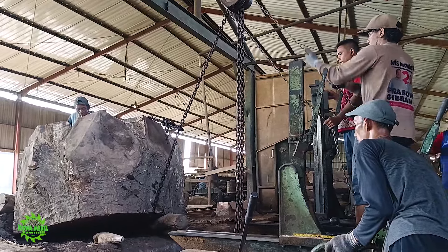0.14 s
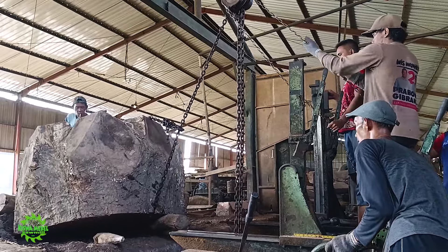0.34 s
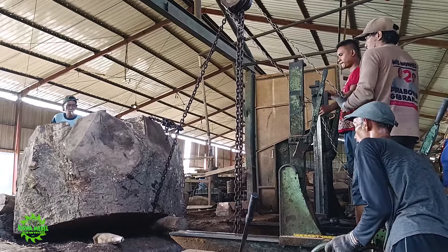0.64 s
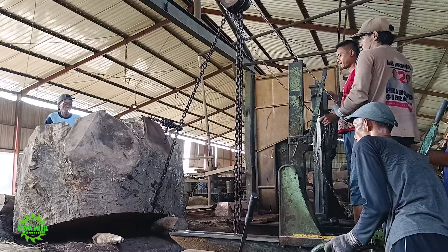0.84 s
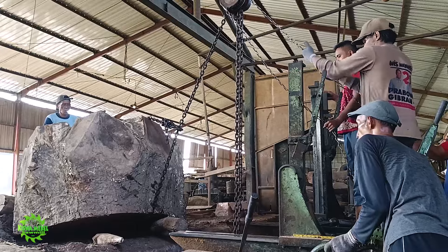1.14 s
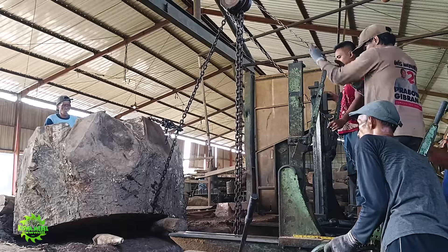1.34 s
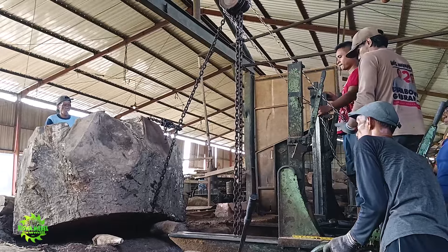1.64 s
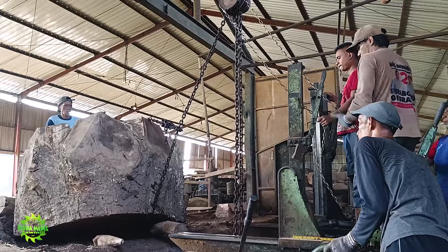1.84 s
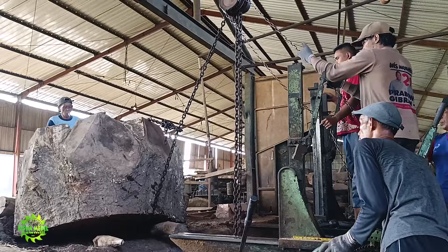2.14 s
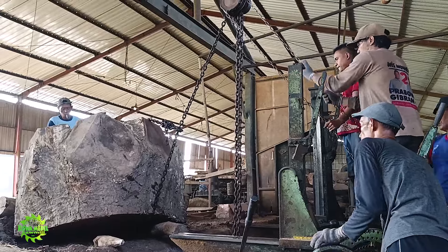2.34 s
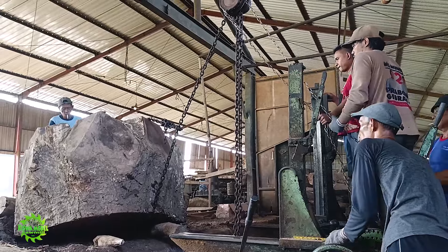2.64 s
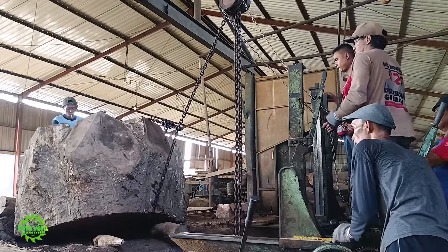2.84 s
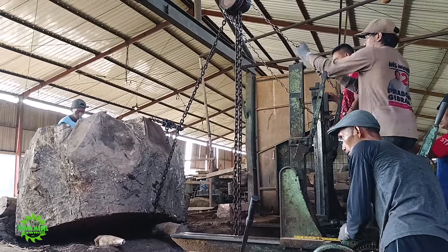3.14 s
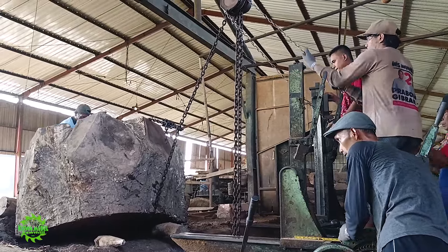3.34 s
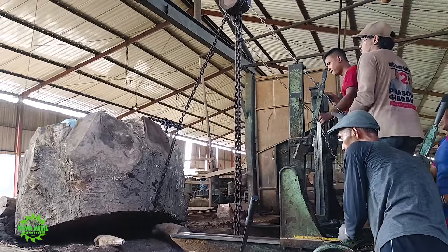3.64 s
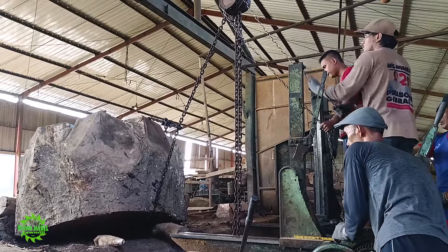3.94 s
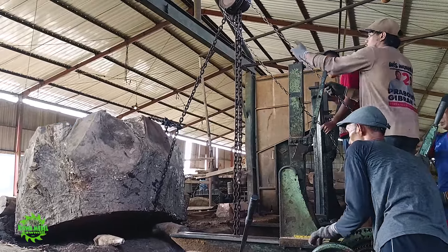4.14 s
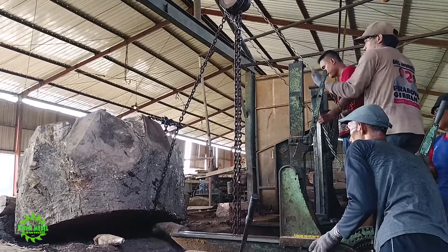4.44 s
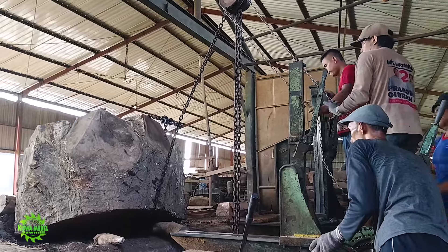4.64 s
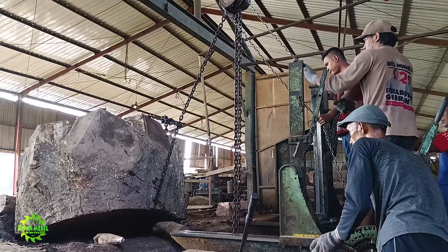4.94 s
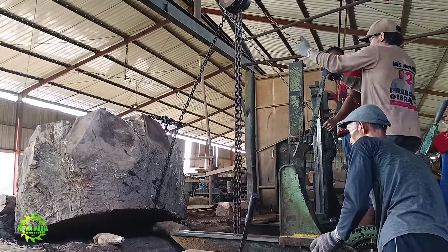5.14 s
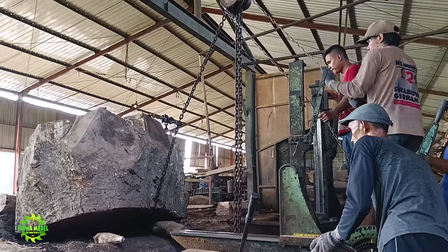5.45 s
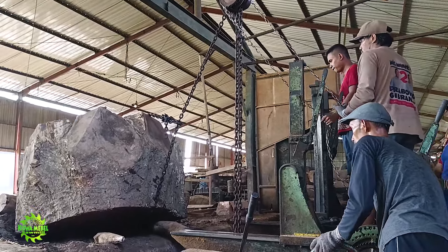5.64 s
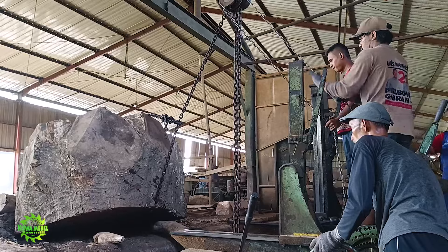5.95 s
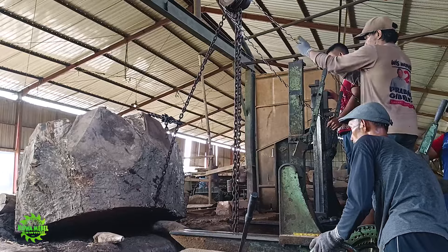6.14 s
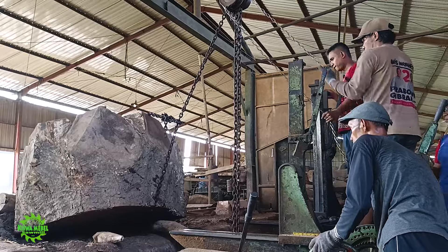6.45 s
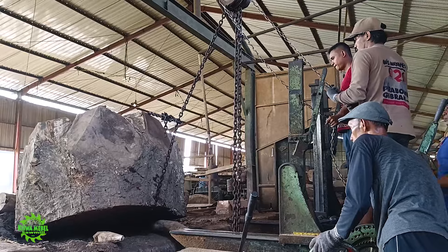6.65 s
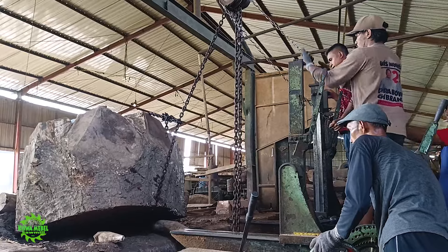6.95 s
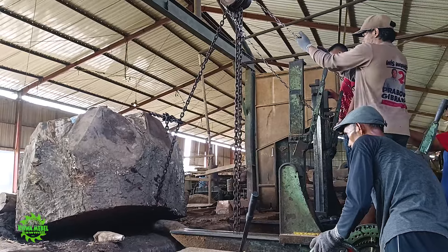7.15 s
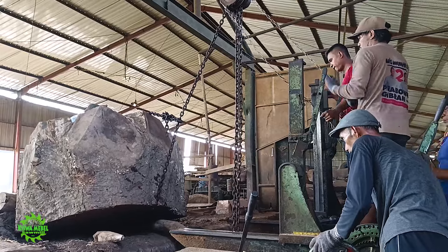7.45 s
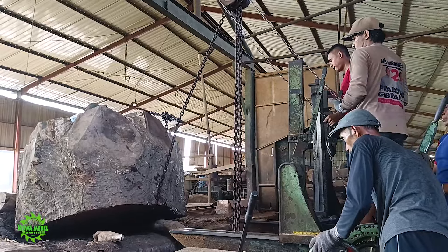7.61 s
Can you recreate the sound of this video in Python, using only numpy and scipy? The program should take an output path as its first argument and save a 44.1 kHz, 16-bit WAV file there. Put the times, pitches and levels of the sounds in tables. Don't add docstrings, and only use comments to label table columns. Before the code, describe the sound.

An open, tin-roofed workshop with a low lumpy hum, faint motor drone and far wash throughout. A hand chain hoist is hauled close to a stereo microphone pair, eight pulls about a second apart, starting near 0.4, 1.4, 2.4, 3.4, 4.4, 5.3, 6.3 and 7.3 s. Each begins with slack links knocking, swells into a bright dense rattle with heavy pawl clacks and ringing steel housing, then drops after roughly 0.3 to 0.5 s into sparse knocks and short echo. The first haul is longest and slows; the third lets go quickly, its housing booming as it coasts. Ringing links linger near 1.7 s; strong jingles come around 2.5, 5.7 and 7.6 s. A very high, faint bearing squeal accompanies the pulls. Around 6.9 s, four tiny dry finger ticks land on the right side. The last haul fades with clacks and rattle towards 7.8 s.

```python
import sys
import numpy as np
from scipy import signal
from scipy.fft import rfft, irfft, next_fast_len
from scipy.io import wavfile
from scipy.ndimage import uniform_filter1d, map_coordinates

SR = 44100
rng = np.random.default_rng(int(sys.argv[2]) if len(sys.argv) > 2 else 0)


def to_wav(s):
    ch = np.atleast_2d(s).T
    pcm = np.round(np.clip(ch, -1, 1) * 32767)
    wavfile.write(sys.argv[1], SR, pcm.astype(np.int16))


def ratio_of_db(decibels):
    return 10 ** (np.asarray(decibels, float) / 20)


N = 343098


def unit(x):
    return x / np.sqrt(np.mean(x ** 2) + 1e-20)


def along(points, hz):
    f, v = np.transpose(points)
    return np.interp(np.log(hz + 1), np.log(f + 1), v)


def curves(rows):
    s, *cols = np.transpose(rows)
    return [np.interp(np.arange(N) / SR, s, c) for c in cols]


def wobble(rate):
    knots = rng.standard_normal(int(N * 60 / SR) + 4)
    return map_coordinates(knots, [np.arange(N) * min(rate, 60) / SR])


def filtered(x, response):
    m = next_fast_len(N + SR // 2)
    return irfft(rfft(x, m) * response(np.fft.rfftfreq(m, 1 / SR)), m)[..., :N]


def modes(table):
    def response(f):
        total = 0
        for k, (hz, width, db) in enumerate(table):
            total = total + (-1) ** k * ratio_of_db(db) * 1j * f * width / (hz * hz - f * f + 1j * f * width)
        return total
    return response


def fading(power, t60):
    pole = np.exp(-np.log(1e6) / (t60 * SR))
    return signal.lfilter([1 - pole], [1, -pole], power)


def swells(rows, rise_db, fall_db):
    t = np.arange(N) / SR
    levels = []
    for s, hold, db in rows:
        early, late = np.maximum(s - t, 0), np.maximum(t - s - hold, 0)
        levels.append(db - rise_db * early - fall_db * late)
    return np.max(levels, axis=0)


def mottled(depth_db):
    z = signal.stft(rng.standard_normal((2, N)), nperseg=512, noverlap=384)[2]
    field = unit(uniform_filter1d(rng.standard_normal(z.shape[1:]), size=9, axis=1))
    return unit(signal.istft(z * ratio_of_db(depth_db * field), nperseg=512, noverlap=384)[1][:, :N])


def bursts(power, t60, rise, hall_db, hall_t60, mottle_db, crack=0):
    crack_s, dull_hz, bass_lingers = 0.038, 800, 2.5
    echo = filtered(rng.standard_normal((2, N)), lambda f: 1 / (1 + (f / 4000) ** 2))
    dull = signal.lfilter(*signal.butter(1, dull_hz, fs=SR), echo)
    bright = echo - dull

    def tail(tail_t60):
        return np.sqrt(fading(fading(power, tail_t60), 0.16))

    share = np.clip(crack, 0, 1)
    blow = fading((1 - share) * fading(power, t60) + share * fading(power, crack_s), rise)
    answer = dull * tail(bass_lingers * hall_t60) + bright * tail(hall_t60)
    return np.array([mottled(mottle_db) * np.sqrt(blow), ratio_of_db(hall_db) * answer])


def ringing(x, table, turns, spread_db):
    luck = ratio_of_db(spread_db * np.clip(rng.standard_normal((turns[-1] + 1, len(table))), -3, 1.8))
    out = 0
    for k, (hz, width, db) in enumerate(table):
        drive = ratio_of_db(db) * (x[0] * luck[turns, k] + x[1])
        out = out + (-1) ** k * signal.lfilter(*signal.iirpeak(hz, hz / width, SR), drive)
    return out


def no_bass(f):
    return 1 / (1 + (440 / (f + 1)) ** 10)


def pulling():
    # grip_s, fastest_s, let_go_s, rattle_db, slowing_db (lost by let-go)
    pulls = [
        (0.428, 0.58, 0.92, -17, 21),
        (1.37, 1.488, 1.8, -16.5, 10),
        (2.415, 2.58, 2.7, -16.5, 11.5),
        (3.398, 3.487, 3.68, -17, 6.5),
        (4.376, 4.476, 4.624, -17.5, 1.5),
        (5.346, 5.593, 5.68, -18, 0.5),
        (6.339, 6.474, 6.65, -17.5, 8.5),
        (7.326, 7.416, 7.62, -16.5, 5),
    ]
    # coasting housing_db, rattle_db at rest, rattle_db as the hand reaches up again
    coasts = [
        (-17, -47, -49),
        (8, -54, -35),
        (27.5, -57.5, -47.5),
        (16, -55, -44.5),
        (16, -68, -46),
        (8.5, -47.5, -48.5),
        (19.5, -60, -41.5),
        (13.5, -75, -52),
    ]
    # time_s, rattle_db, housing_db (over the rattle)
    before = [
        (0, -43.5, 13.5),
        (.25, -56, -4),
    ]
    # extra housing_db, extra jingle_db
    seating = [
        (2, 0),
        (3, 2),
        (-0.5, 2.5),
        (2, 3.5),
        (-1, 3),
        (0.5, 2.5),
        (2, -0.5),
        (-1, 2),
    ]
    take_up_s, drop_s, settle_s = 0.096, 0.11, 0.37
    grip_db, drop_db = 5, 15
    slack_low, grip_low, fast_low, let_go_low = 8, 4.5, 0.1, 0.5
    rows = [(*row, 0) for row in before]
    reach_db = before[-1][1]
    for pull, (low_db, high_db), (coast_db, rest_db, next_db) in zip(pulls, seating, coasts):
        grip, top, go, db, sag = pull
        rows += [(grip - take_up_s, reach_db, slack_low, 0),
                 (grip, db - grip_db, grip_low + low_db, high_db),
                 (top, db, fast_low + low_db, high_db),
                 (go, db - sag, let_go_low + low_db, high_db),
                 (go + drop_s, db - sag - drop_db, coast_db, 0),
                 (go + settle_s, rest_db, slack_low, 0)]
        reach_db = next_db
    return curves(sorted(rows))


def knocks():
    # time_s, peak_db, housing_db
    catches = [(0.311, -22, 4), (0.394, -21.5, 3), (0.423, -14.5, 3), (1.269, -26, 11), (1.3079, -32, 6),
               (1.34, -23, 11), (1.3582, -12.5, 3), (2.271, -25.5, 3), (2.3366, -37, 2), (2.366, -21, 0),
               (2.377, -13, 5), (3.305, -25.5, 1), (3.337, -20.5, -18), (3.389, -15, -26), (4.2708, -24, 3),
               (4.301, -21.5, 6), (4.322, -15, -24), (5.164, -27, -13), (5.206, -30, -11),
               (5.238, -19.5, 5), (5.247, -14, -5), (5.334, -14.5, 7.5), (6.2761, -44, 3),
               (6.3032, -17, -18), (6.371, -12.5, 7), (7.215, -27, 11.5), (7.2562, -14.5, -5),
               (7.3267, -13.5, 0), (7.3684, -12.5, 11)]
    # time_s, peak_db, housing_db
    pawl = [(0.482, -12, -14), (0.5596, -9, -13), (.62, -19.5, 19), (0.6487, -10, 4), (3.747, -20.5, 11),
            (7.28, -24, 9), (2.87, -28.5, 9), (3.862, -32, 12), (0.7193, -11, 3), (0.76, -13.5, -10),
            (1.528, -10, -1), (1.5496, -12.5, 16.5), (1.576, -12, -9), (1.6256, -12, 14.5),
            (1.6641, -12, -12), (1.716, -14.5, -20), (1.737, -16, -26), (2.4783, -12, -8), (2.611, -9.5, 4),
            (2.71, -9, 2), (2.7602, -9.5, 6), (3.4722, -9, 7), (3.5814, -12.5, 13), (3.706, -10, -14),
            (3.767, -11.5, -2), (4.434, -10, 9), (4.514, -15.5, 13.5), (4.6473, -7, 4.5), (5.398, -14, 7),
            (5.425, -12.5, 9), (5.5212, -10, 5.5), (5.645, -12.5, 9), (5.678, -11, -2), (6.505, -7, 9),
            (6.616, -6.5, 2), (7.408, -8.5, 11), (7.5646, -6.5, -26)]
    # time_s, peak_db, housing_db
    swings = [(.122, -36.5, -15), (.275, -42, 12), (1.322, -28, 12), (2.971, -37, 12), (4.858, -34.5, 8),
              (4.882, -38, 10), (6.292, -33, 11), (7.19, -35, 9), (7.238, -36, 10), (5.294, -26, 0),
              (3.352, -24, 2), (.187, -27, 3), (.975, -28.5, -10), (1.2471, -32, -12), (6.035, -31.5, -12),
              (6.1568, -36, -11), (6.775, -28, -1), (0.193, -38, -9), (0.849, -18, -27), (0.8774, -16, -52),
              (1.102, -23, -29), (1.887, -20.5, -9), (2.087, -32, 7), (2.1924, -32, 16), (2.986, -34, 13),
              (3.1107, -22.5, 10), (4.147, -24, 4), (4.806, -43, 1), (4.9678, -29, 6), (5.8353, -24.5, 11),
              (5.88, -20.5, -12), (6.082, -28.5, -12), (6.1986, -34, 16.5), (6.8853, -28, -12),
              (6.899, -30, -18), (4.212, -32, 0), (7.098, -38, -10), (7.0045, -40.5, -20),
              (7.0778, -38, -6), (7.1234, -31.5, -12), (7.151, -29, -16), (7.176, -26.5, -16)]
    # time_s, peak_db
    pockets = [(0.456, -9), (0.536, -3.5), (0.588, 2.5), (0.661, -0.5), (0.68, -1.5), (0.81, -44),
               (1.378, -8), (1.394, -15), (1.429, -11), (1.453, -10), (1.495, -5), (1.596, -13),
               (1.692, -5), (1.796, -28), (2.442, -13), (2.507, -17), (2.533, -1), (2.561, -2.5),
               (2.675, -13), (2.789, -15), (2.817, -21), (2.845, -24), (2.911, -25), (3.411, -19),
               (3.44, -3), (3.507, -2), (3.556, -2.5), (3.608, -13), (3.643, -16), (3.778, -16),
               (3.816, -14), (4.388, -8), (4.489, -25), (4.555, -4.5), (4.62, -4.5), (4.679, -3),
               (4.721, -13), (4.769, -20), (5.356, -27), (5.444, 1), (5.483, -2.5), (5.577, -21),
               (5.621, -4), (5.675, -9), (5.702, -1.5), (5.721, -6.5), (5.793, -32), (6.346, -26),
               (6.386, -19), (6.442, -9), (6.48, -4), (6.532, -6), (6.684, -21), (6.804, -26),
               (7.387, -2.5), (7.42, -18), (7.441, -4.5), (7.501, -5), (7.623, -8), (7.669, -28)]
    slack = [*catches, *swings]
    grazes = [(s - 0.0064, db - 13.5, low_db) for s, db, low_db in slack]
    running = [*pawl, *[(s, db - 10, 7) for s, db in pockets]]
    late = .007 * rng.random((len(running), 3)) * [0, 1, 1]
    contacts = []
    for (s, db, low_db), waits in zip(running, late):
        contacts += [(s + wait, db - 5.0, low_db) for wait in waits]
    s, db, low_db = np.transpose([*slack, *grazes, *contacts])
    return np.round(s * SR).astype(int), db, low_db


def flung_links():
    # time_s, level_db
    shakes = [(.122, -52), (4.837, -38), (6.225, -38), (5.691, -16), (7.59, -21), (.4239, -25),
              (.4813, -22), (.62, -24), (.7617, -21), (.86, -23.5), (1.6816, -31), (1.7175, -26),
              (2.3366, -27), (2.4783, -16.5), (2.6733, -28), (2.7591, -24), (3.338, -27), (3.7075, -25),
              (4.3244, -25), (4.6229, -30), (4.6463, -21), (5.243, -24), (6.4213, -19), (6.616, -27),
              (7.3262, -23)]
    s, db = np.transpose(shakes)
    return np.bincount(np.round(s * SR).astype(int), ratio_of_db(2 * (db + 34.0)), N)


def chain_wheel(power, turns):
    # pitch_hz, width_hz, level_db
    wheel = [(1592, 45, -2), (1745, 50, -3), (2200, 70, -3), (2365, 50, -2), (2715, 55, -3),
             (3200, 120, -6), (3440, 150, -7), (3960, 100, -6), (5464, 40, -6)]
    # pitch_hz, level_db per Hz
    rattle = [(250, -30), (390, -21.5), (500, -9.5), (1300, -12), (2400, -12.5), (3600, -17), (5200, -21),
              (6800, -18.5), (7300, -27), (9500, -40), (11000, -39.5), (13300, -55), (14900, -45),
              (15300, -62)]
    steel = bursts(power, t60=0.16, rise=0.0018, hall_db=-7.5, hall_t60=0.51, mottle_db=3.5, crack=0.23)
    mix = 1.121 * steel.sum(axis=0) + ringing(steel, wheel, turns, spread_db=3.5)
    return filtered(mix, lambda f: ratio_of_db(along(rattle, f)))


def steel_housing(power, turns):
    # pitch_hz, width_hz, level_db
    housing = [(322, 9, -6), (360, 11, -7), (478, 30, -2), (516, 20, 2.5), (592, 28, -6.5), (790, 40, -6),
               (848, 34, -2), (1110, 38, -3), (1175, 40, -6), (1258, 45, -2), (1480, 120, -17),
               (1810, 25, -12)]
    knock = bursts(power, t60=0.012, rise=0.0023, hall_db=-2.0, hall_t60=0.22, mottle_db=3.0)
    plates = .1 * filtered(knock.sum(axis=0), lambda f: modes([(1150, 2100, 1.5)])(f) ** 2 * no_bass(f))
    notes = ringing(knock, housing, turns, spread_db=2.0)
    return plates + filtered(notes, lambda f: .25 + .75 * no_bass(f))


def loose_links(power, turns):
    # pitch_hz, width_hz, level_db
    links = [(6500, 90, -3), (7250, 60, -4), (7610, 50, -1), (8620, 50, -1), (9120, 60, -4), (9500, 80, -7)]
    shake = bursts(power, t60=0.16, rise=0.0021, hall_db=-22, hall_t60=.5, mottle_db=1.5)
    chinks = 0.18 * filtered(shake.sum(axis=0), lambda f: modes([(8000, 4500, 0)])(f) ** 2)
    return chinks + .42 * ringing(shake, links, turns, spread_db=5)


def hoist():
    rattle_db, housing_db, extra_db = pulling()
    jingle_db = extra_db - 11.5 - 0.11 * (rattle_db.max() - rattle_db)
    at, db, low_db = knocks()
    chance, size = rng.random(N), np.clip(rng.standard_normal(N), -2, 1.6)
    strikes = (chance < 160 / SR) * ratio_of_db(2 * 3.5 * size)
    strikes = .32 * strikes / strikes.mean() + .38
    turns = np.cumsum((chance < 30 / SR) + np.bincount(at, minlength=N))

    def blows(flow_db, hit_db):
        return ratio_of_db(2 * flow_db) * strikes + np.bincount(at, ratio_of_db(2 * hit_db), N)

    wheel = chain_wheel(blows(rattle_db + 17.5, db + 37.5), turns)
    housing = steel_housing(blows(rattle_db + housing_db + 10, db + low_db + 31.0), turns)
    shaking = blows(rattle_db + jingle_db + 10.5, db - 22.5 + 36.5) + flung_links()
    return wheel + housing + loose_links(shaking, turns)


def rings():
    # start_s, level_db, pitch_hz, t60_s
    lone_parts = [(.758, -20.5, 3250, 0.16), (.19, -38, 870, 0.073), (.115, -38.5, 940, .1),
                  (2.765, -23, 1250, 0.11), (2.78, -23.5, 700, 0.51), (.7, -26.5, 360, 0.46),
                  (0.99, -35, 1100, 0.057), (.309, -25.5, 1200, 0.2), (1.722, -22, 3700, 0.45),
                  (1.735, -24, 5000, 0.12), (1.72, -22, 4500, .12), (1.724, -22, 3200, 0.2),
                  (1.72, -21.5, 7600, 0.17), (1.685, -27, 6400, 0.5), (1.735, -48, 8800, 0.25),
                  (1.68, -30, 8650, 0.13), (1.74, -24.5, 4800, 0.17), (2.088, -33, 960, 0.051),
                  (1.719, -25.5, 8650, 0.12), (2.199, -32, 1476, 0.38), (3.113, -50, 1210, .08),
                  (4.84, -48, 10550, 0.22), (4.303, -20, 1300, .05), (4.6, -27, 1200, 0.056),
                  (7.218, -36, 3400, .08), (7.078, -28, 1350, 0.03), (7.256, -13, 1132, 0.077),
                  (7.594, -19, 3270, 0.3), (7.61, -29, 3600, .15)]
    x, t = np.zeros((2, N + SR)), np.arange(SR // 2) / SR
    for s, db, hz, t60 in lone_parts:
        drift = np.cumsum(rng.standard_normal((2, len(t))), axis=1) * .14
        envelope = ratio_of_db(db - 60 * t / t60) * (1 - np.exp(-t / 0.00017))
        x[:, round(s * SR):][:, :len(t)] += envelope * np.sin(2 * np.pi * hz * t + drift)
    return x[:, :N]


def bearing():
    # start_s, hold_s, level_db, pitch_hz
    squeals = [(0.67, 0.041, -39, 14260), (0.967, 0.037, -47, 14200), (1.52, .14, -42.5, 14270),
               (1.845, .04, -58, 14700), (2.116, .04, -62, 14400), (2.5, 0.2, -45, 14300),
               (2.9, 0.29, -68, 14400), (3.48, 0.24, -49, 14300), (4.008, .01, -60, 14300),
               (4.217, .05, -63, 14300), (4.5, 0.23, -47, 14300), (4.844, 0.025, -56, 14300),
               (5.133, .04, -66, 14450), (5.56, 0.086, -45, 14450), (5.798, .02, -58, 14400),
               (6.079, 0.2, -54.5, 14300), (6.441, 0.17, -48, 14200), (6.846, .35, -56.5, 14330),
               (7.46, 0.18, -50, 14370)]
    s, hold, db, hz = np.transpose(squeals)
    pitch = curves(np.transpose([s + hold / 2, hz]))[0] + 40 * wobble(12)
    flutter = filtered(rng.standard_normal((2, 2, N)), lambda f: 1 / (1 + (f / 185) ** 4))
    turn = 2 * np.pi * np.cumsum(pitch) / SR
    band = flutter[0] * np.cos(turn) + flutter[1] * np.sin(turn)
    level_db = swells(zip(s, hold, db), rise_db=126, fall_db=176)
    return ratio_of_db(level_db + 1.0 + 3.8 * wobble(22)) * unit(band)


def finger():
    # time_s, push (minus = pressed in), thud_hz, thud_t60_s, rise_s
    ticks = [
        (6.8985, .15, 700, .004, .0002),
        (6.91646, -3, 700, .0011, .00019),
        (6.93468, -.52, 930, .006, .00002),
        (6.9577, .26, 780, .0035, .00003),
    ]
    x, t = np.zeros(N), np.arange(900) / SR

    def ring(hz, t60, rise):
        return ratio_of_db(-60 * t / t60) * np.cos(2 * np.pi * hz * t) * (1 - np.exp(-t / rise))

    for s, push, hz, t60, rise in ticks:
        nail = rise < .0001
        snap = .9 * nail * ring(6300, .002, .00005)
        sway = .075 * ring(140, .014, .0003)
        tick = push * (ring(hz, t60, rise) - snap - sway)
        soft = signal.butter(2, 12500 if nail else 6000, fs=SR)
        x[round(s * SR):][:len(t)] += signal.lfilter(*soft, tick)
    return x * ratio_of_db([[-30], [0]])


def machines():
    # pitch_hz, level_db per Hz
    hum_colour = [(25, -30), (46, -17), (75, 0.5), (134, -4), (162, 0.5), (243, -14), (322, -2.5),
                  (388, -12.5), (420, 1.5), (550, -5.5), (920, -120)]
    # pitch_hz, width_hz, level_db
    beams = [(110.5, 8, 7), (159, 8.1, 3.5), (210.7, 18, 6), (272.4, 12.7, 4.5), (321, 5.6, 3.5),
             (363.6, 7, 5.5)]
    # pitch_hz, level_db per Hz
    shed = [(40, -90), (120, -33), (200, -2), (397, -12.5), (1020, -9.5), (1950, -17.5), (2700, -31),
            (6700, -49), (12000, -57), (15600, -90), (22000, -120)]
    # time_s, level_db
    shudder = [
        (0, -38.5),
        (.62, -35.5),
        (.9, -40),
        (1.75, -34.5),
        (2.68, -32.5),
        (3.72, -34),
        (4.62, -34.5),
        (5.74, -34),
        (6.8, -36.5),
        (7.68, -33),
    ]
    # time_s, pitch_hz, level_db
    motor = [(0.0, 56, -62), (0.35, 56.2, -50), (.75, 56, -50), (1.65, 60, -58), (1.86, 55, -48),
             (2.4, 56, -53), (2.9, 58.2, -60), (3.25, 56, -48), (3.6, 56, -51), (4.45, 60, -60),
             (4.68, 60.9, -45.5), (5.5, 61, -51), (5.75, 61, -60), (6.25, 61, -43), (6.69, 61, -56),
             (7.2, 61, -56), (7.5, 60, -47), (7.78, 60, -45)]
    jolts = [(s, 0.08, db) for s, db in shudder]
    frame_db = np.maximum(swells(jolts, rise_db=30.5, fall_db=23), -42.5)
    drone_hz, drone_db = curves(motor)

    def noise(response):
        return unit(filtered(rng.standard_normal((2, N)), response))

    hum = noise(lambda f: ratio_of_db(along(hum_colour, f)) * (.33 + abs(modes(beams)(f))))
    turn = 2 * np.pi * np.cumsum(drone_hz + 1.8 * wobble(7)) / SR
    drone = ratio_of_db(2.0 + 3.5 * wobble(9)) * np.sin(turn) * np.array([[1], [0]])
    wash = noise(lambda f: ratio_of_db(along(shed, f)))
    hum = ratio_of_db(frame_db + 1.84 * wobble(9.2)) * hum
    return hum + ratio_of_db(drone_db) * drone + ratio_of_db(-43.5 + 0.086 * wobble(15)) * wash


def ports(pair):
    # pitch_hz, likeness (0 to 1)
    alike = [(60, .97), (130, .94), (290, .88), (640, .82), (1400, .58), (3000, .45), (15000, .4)]
    # pitch_hz, lead in radians
    lead = [(60, 0), (860, 0.54), (1380, 1.89), (2330, 1.7), (15000, 1.58)]
    # pitch_hz, level_db
    balance = [(60, -0.5), (200, -1.5), (380, -0.5), (700, -4), (1290, -9), (1900, -0.5), (2400, 3),
               (3200, 9.5), (4300, 11), (5500, 13.5), (6600, 1), (9000, 16), (12000, 8), (15000, 6.5)]

    def share(f):
        angle = np.arccos(np.clip(along(alike, f), 0, 1)) / 2
        return np.array([np.cos(angle), np.sin(angle)])

    def tilt(f):
        left = ratio_of_db(along(balance, f) / 2) * np.exp(.5j * along(lead, f))
        return np.array([left, 1 / left])

    a, b = filtered(pair, share)
    return filtered(np.array([a + b, a - b]), tilt)


def scene():
    return ports(hoist() + rings() + bearing() + machines()) + finger()


def thinned(x, low_hz, depth_db, scatter_db, top_db):
    hz, _, z = signal.stft(x, SR, nperseg=1024, noverlap=512)
    power = abs(z) ** 2
    bands = power[:, :512].reshape(2, 32, 16, -1).mean(axis=2)
    whim = unit(uniform_filter1d(rng.standard_normal(bands.shape), size=3, axis=2))
    bar_db = depth_db + scatter_db * whim + top_db * (hz[:512:16, None] > 14400)
    bar = power.mean(axis=1, keepdims=True) * ratio_of_db(2 * bar_db)
    keep = np.repeat(bands > bar, 16, axis=1) | (hz[:512, None] < low_hz)
    z[:, :512] *= keep
    return signal.istft(z, SR, nperseg=1024)[1][:, :N]


def top_cut(x):
    return signal.sosfilt(signal.butter(12, 16170, fs=SR, output="sos"), x)


def record(dry):
    x = dry / (1 + abs(dry / .8) ** 6) ** (1 / 6)
    x = thinned(x, low_hz=9700, depth_db=-30.5, scatter_db=10.5, top_db=10)
    x = filtered(x, lambda f: np.clip((15900 - f) / 120, 0, 1) / (1 + (36 / (f + 1)) ** 6))
    return top_cut(x)


dry = scene()
out = record(dry)
to_wav(out)
```